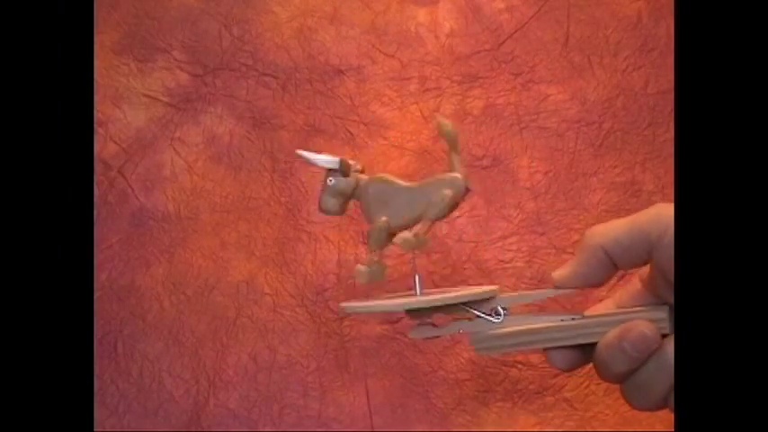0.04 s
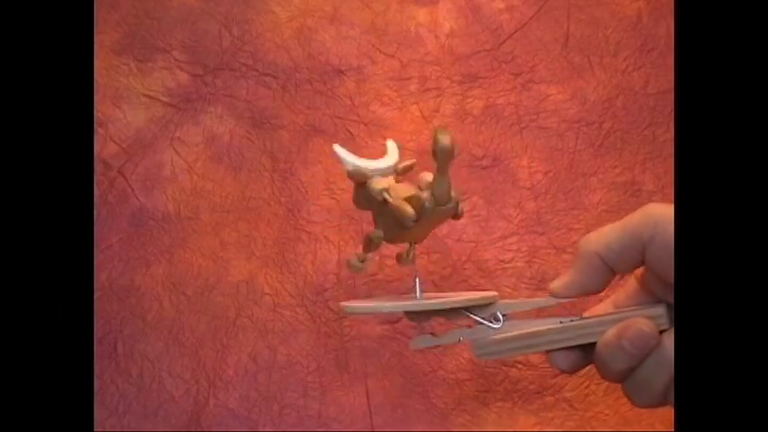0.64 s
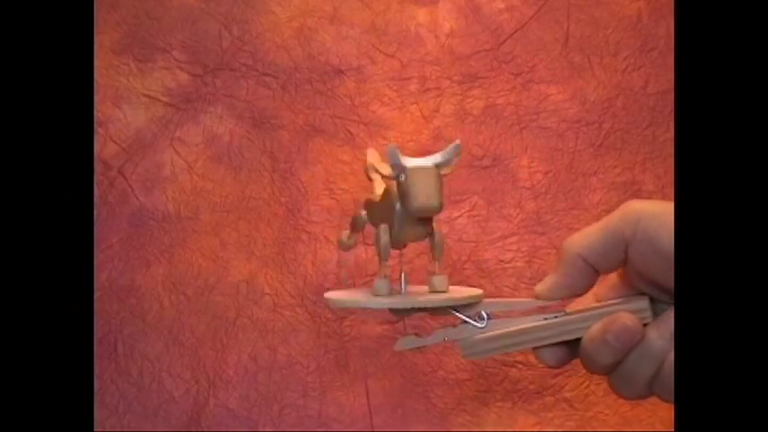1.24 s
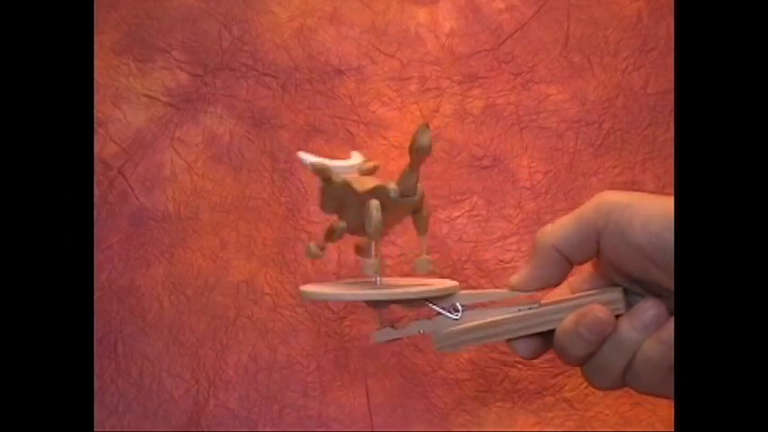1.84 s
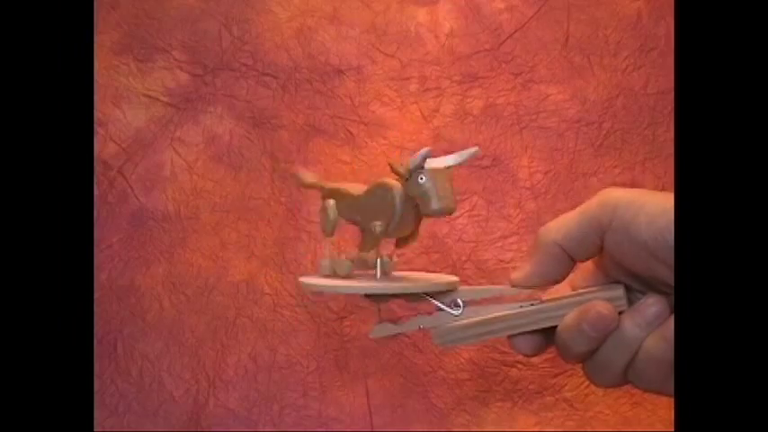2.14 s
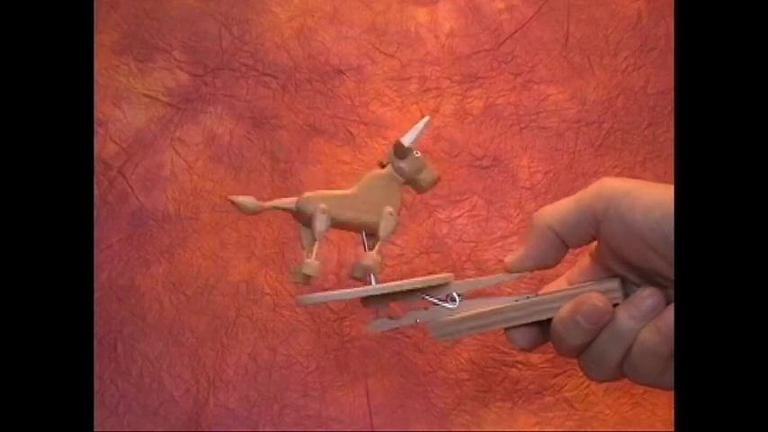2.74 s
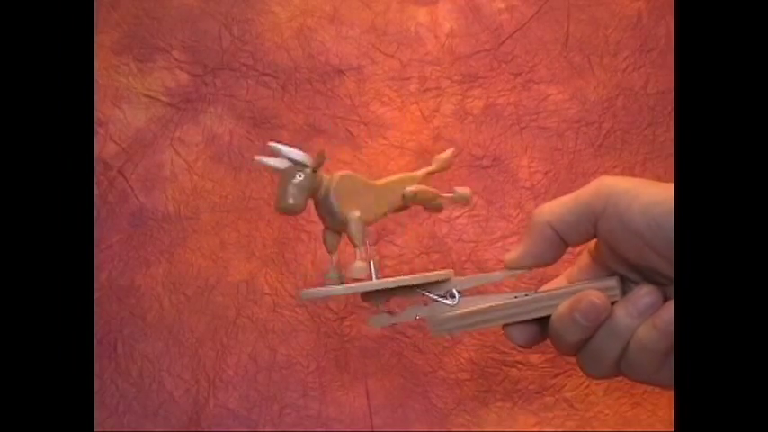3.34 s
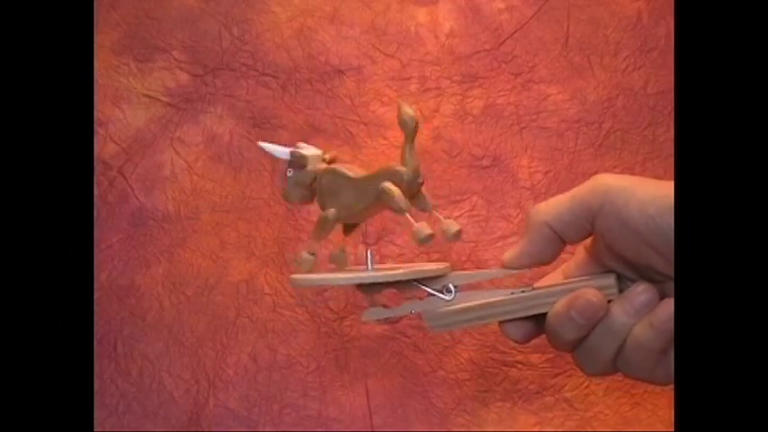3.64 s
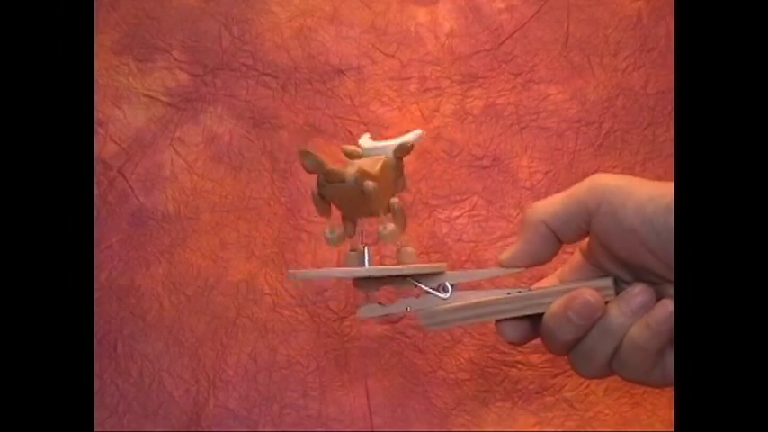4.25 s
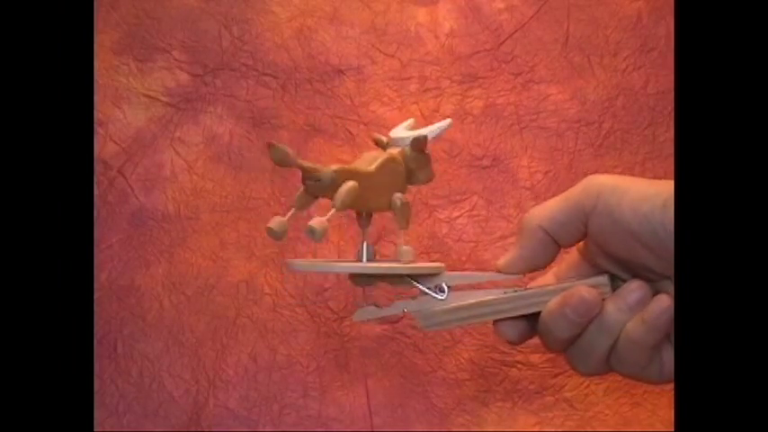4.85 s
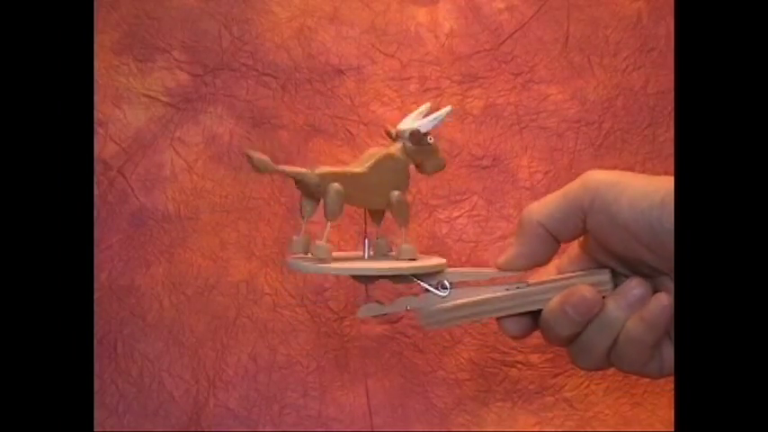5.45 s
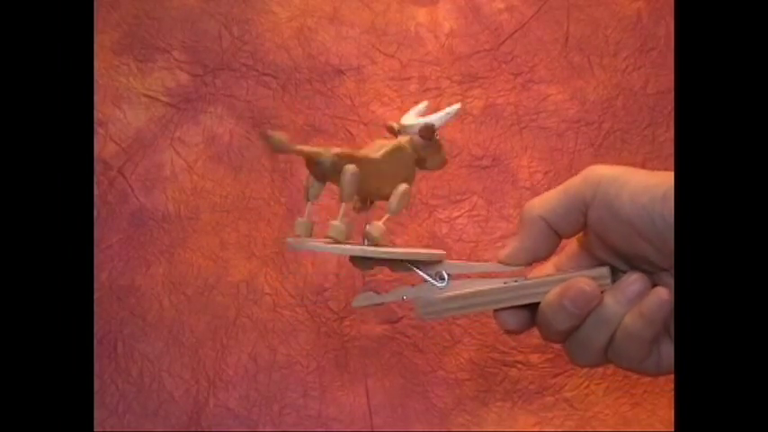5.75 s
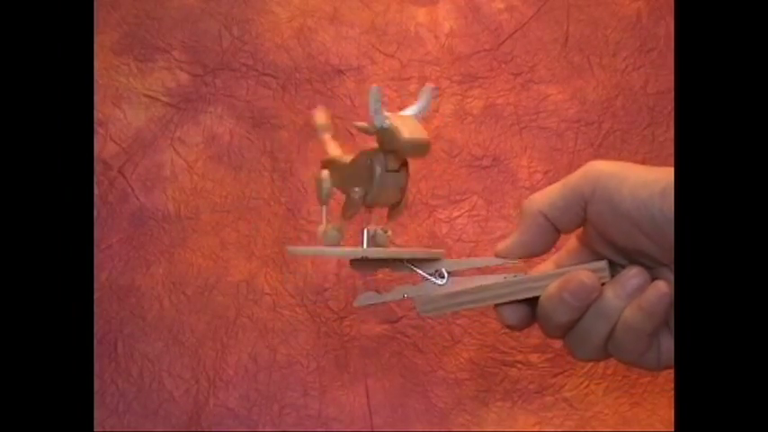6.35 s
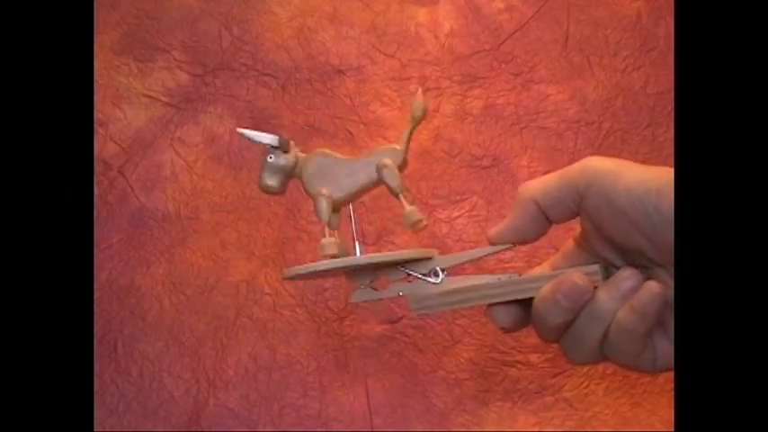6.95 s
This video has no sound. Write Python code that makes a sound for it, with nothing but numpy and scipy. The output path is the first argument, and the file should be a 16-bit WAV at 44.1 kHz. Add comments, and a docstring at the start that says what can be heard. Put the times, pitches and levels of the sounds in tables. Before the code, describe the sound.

Quick, uneven wooden clicks and dry little scrapes come from a toy bull bucking on a squeezed clothespin.

```python
"""A bucking wooden toy bull

A jointed wooden bull bucks and spins on a wire above a clothespin that a hand squeezes about seven
times a second. At each squeeze or release the wire and spring rasp over the wood in tiny slips, and
loose legs, head and tail clack on the body and platform. A few hard knocks also ping the wire.
The toy is close by, in a small dry room with soft hiss and a faint low drone."""
import sys
import numpy as np
from scipy import signal
from scipy.io import wavfile

SR = 44100
rng = np.random.default_rng(int(sys.argv[2]) if len(sys.argv) > 2 else 0)


def int16_out(signal):
    """Quantize to a 16-bit WAV file."""
    q = np.round(np.clip(np.atleast_2d(signal).T, -1, 1) * 32767)
    wavfile.write(sys.argv[1], SR, q.astype(np.int16))


N = 317079

# tone of the background hiss: (frequency [Hz], relative level per Hz [dB])
HISS_SPECTRUM = [(25, -35), (60, -14.5), (135, -16), (215, -3), (380, -4.5), (520, 4), (680, 0), (950, 0.5),
                 (1600, -0.5), (3000, -9), (5500, -16), (9000, -20.5), (15000, -30)]
# the hiss grows a little louder halfway: (time [s], level [dB])
HISS_LEVEL = [(0.0, -52), (3.02, -51.5), (3.8, -49.5), (7.19, -49.5)]
# how alike the hiss is in both ears: (frequency [Hz], likeness [0 to 1])
HISS_LIKENESS = [(40, 0.83), (120, 0.25), (300, 0.52), (600, 0.7), (1500, 0.84), (5000, 0.66),
                 (12000, 0.14)]
# hollow resonances in the hiss: (frequency [Hz], width [Hz], relative level [dB])
HISS_MODES = [(99.2, 5.7, 1.5), (166, 5.3, -2), (305, 22, -4.5), (502, 48, 0.5), (777, 50, -4.5),
              (950, 78, -1.5)]
# swells of the low drone: (start [s], length [s], pitch [Hz], level [dB])
DRONE_SWELLS = [(3.528, .22, 48, -69), (3.78, 0.22, 59, -66), (4.039, 0.29, 62, -72.5), (5.3, .75, 61, -79),
                (6.672, 0.6, 50, -71)]
# the room's echoes: (frequency [Hz], relative level per Hz [dB], time to fade by 60 dB [s])
ROOM_ECHOES = [(298, 0.5, 0.22), (970, 7.5, 0.067), (2560, 1.5, 0.19), (4520, -1, 0.2), (8000, -1.5, 0.14),
               (14000, -17, 0.35)]
# hard knocks that ping the steel wire: (time [s], peak level [dB])
WIRE_PINGS = [(0.1547, -40), (1.92, -25), (3.2481, -34), (5.0805, -15.5), (6.404, -27)]
# strokes of the wire over the wood: (start [s], length [s], level [dB])
WIRE_STROKES = [(-.04, 0.28, -45), (.15, .055, -45), (0.251, 0.058, -42), (0.324, 0.2, -45.5),
                (0.537, 0.1, -42), (0.616, 0.094, -47.5), (0.695, 0.12, -45), (0.808, 0.052, -43.5),
                (0.869, 0.069, -53), (0.948, 0.16, -40), (1.108, 0.042, -40.5), (1.217, 0.13, -42.5),
                (1.393, 0.074, -40.5), (1.504, .16, -42.5), (1.673, 0.048, -44.5), (1.722, .075, -41.5),
                (1.815, 0.12, -41.5), (1.905, 0.087, -41), (1.983, 0.087, -41.5), (2.108, 0.12, -41.5),
                (2.274, 0.032, -41.5), (2.348, 0.051, -48), (2.432, 0.13, -41), (2.576, 0.12, -45.5),
                (2.746, 0.14, -42), (2.909, .05, -45), (3.05, .12, -41.5), (3.196, 0.13, -41.5),
                (3.352, 0.11, -42), (3.478, 0.16, -44.5), (3.639, 0.12, -41), (3.785, 0.086, -42.5),
                (3.851, .06, -54), (3.938, 0.084, -38), (4.124, .055, -44.5), (4.209, 0.19, -46.5),
                (4.399, 0.046, -41.5), (4.483, 0.047, -51), (4.544, 0.11, -38), (4.706, 0.089, -43.5),
                (4.829, 0.081, -38), (4.983, 0.038, -43.5), (5.056, 0.027, -52), (5.122, 0.087, -40.5),
                (5.249, 0.1, -44), (5.428, 0.089, -40), (5.568, 0.085, -41.5), (5.727, 0.1, -35),
                (5.839, 0.032, -41.5), (5.866, 0.074, -39), (5.937, 0.058, -44), (6.016, 0.087, -39),
                (6.139, .08, -42), (6.331, 0.07, -40), (6.446, 0.081, -42.5), (6.625, 0.092, -38),
                (6.838, 0.14, -43.5), (6.975, 0.14, -43.5), (7.136, 0.065, -42.5)]
# low resonances of wire, spring and clothespin: (frequency [Hz], width [Hz], relative level [dB])
RASP_LOW_MODES = [(940, 1130, -8.5), (1686, 1140, 1), (2396, 430, 7), (3050, 270, 2), (3750, 350, 0),
                  (4750, 300, 0.5), (5600, 290, 5)]
# their high resonances: (frequency [Hz], width [Hz], relative level [dB])
RASP_HIGH_MODES = [(7000, 1300, -6.5), (7870, 420, 6), (8670, 300, 10), (9330, 2100, -2.5),
                   (10540, 380, 3.5), (12840, 740, 1)]
# modes, the tones the wood rings at: (frequency [Hz], relative level [dB], time to fade by 60 dB [s])
WOOD_MODES = [(1737, -9.5, 0.036), (2343, 6, 0.014), (2796, 3, 0.013), (3270, -3, 0.002), (3676, 5, 0.0092),
              (4275, -5.5, 0.0042), (4970, -9.5, 0.017), (5507, -1, 0.014), (5840, -11, 0.0019),
              (7110, -6.5, 0.0031), (8400, 1.5, 0.014), (9506, -1, 0.0078), (11070, -15.5, 0.014),
              (13300, -34.5, 0.0069)]
# borders that sort those modes into four bands: (frequency [Hz])
BAND_EDGES = [1700, 3000, 4600, 7000, 12000]
# band levels for each kind of contact: (low [dB], middle [dB], upper [dB], top [dB])
CONTACT_TONES = {"tap": (-0.5, -10.5, -1.5, -7.5), "tock": (-2, 2, -9.5, -10.5),
                 "clack": (-6.5, 0.5, -4, -3), "tick": (-7.5, -12, 1, -5), "snap": (-24, -17, -11.5, -4)}
# loose parts knocking: (time [s], level [dB], chatter time [s], kind of contact)
LIMB_KNOCKS = [(0.0325, -38.5, 0.0033, "tock"), (0.0627, -38.5, 0.0033, "tock"),
               (0.1548, -33.5, 0.00066, "clack"), (0.1807, -31, .004, "tick"),
               (0.3001, -25, 0.0082, "clack"), (0.336, -31, 0.0049, "clack"), (0.4173, -39, 0.0015, "tick"),
               (0.5923, -35, 0.0023, "clack"), (0.6045, -50, .0013, "tick"), (0.6187, -28, 0.0049, "clack"),
               (0.695, -22.5, 0.0021, "snap"), (0.7562, -29.5, 0.0069, "tick"),
               (0.8579, -23, 0.0014, "clack"), (0.9082, -38.5, .0017, "tick"),
               (0.9378, -40.5, 0.0019, "tap"), (1.0377, -26.5, .004, "tock"), (1.158, -26, 0.0022, "clack"),
               (1.19, -22.5, 0.0025, "clack"), (1.2739, -37.5, 0.0037, "tick"),
               (1.304, -39.5, 0.0016, "tap"), (1.3582, -36, 0.0022, "clack"),
               (1.429, -41.5, 0.0056, "tock"), (1.457, -42, 0.0033, "tock"),
               (1.4942, -29.5, 0.0017, "tock"), (1.5644, -41, .002, "clack"), (1.5874, -33, 0.0063, "tap"),
               (1.5994, -32, 0.0091, "tap"), (1.7298, -25, 0.0035, "clack"),
               (1.8269, -28.5, 0.0053, "snap"), (1.9195, -26, 0.0043, "clack"),
               (1.995, -37, 0.0026, "tock"), (2.0414, -28.5, 0.0012, "clack"),
               (2.1957, -26, 0.0024, "tick"), (2.2083, -28.5, .003, "snap"),
               (2.3172, -25.5, 0.0014, "clack"), (2.4635, -40, 0.0042, "clack"),
               (2.5095, -33.5, 0.0084, "tock"), (2.581, -34, 0.007, "tap"), (2.6518, -31, 0.0011, "clack"),
               (2.702, -39, 0.0015, "tick"), (2.8202, -31, 0.0022, "tap"), (2.9122, -33, 0.00054, "tick"),
               (2.9634, -27.5, 0.0042, "clack"), (2.9978, -27, .0014, "tock"), (3.097, -27, 0.006, "tick"),
               (3.2482, -23.5, 0.0014, "snap"), (3.259, -48, .003, "tick"), (3.3577, -42.5, 0.0029, "tick"),
               (3.409, -36, 0.0012, "tick"), (3.5502, -32.5, 0.0024, "clack"), (3.561, -28.5, .002, "snap"),
               (3.7079, -39.5, 0.0097, "tock"), (3.839, -28, 0.0039, "clack"), (3.8873, -38, .006, "snap"),
               (3.8985, -37, .001, "tick"), (4.0974, -44.5, 0.011, "tap"), (4.1804, -30.5, 0.0012, "clack"),
               (4.291, -34.5, 0.0036, "tick"), (4.3877, -43, .008, "tap"), (4.443, -23.5, .0025, "clack"),
               (4.5997, -34.5, 0.0024, "tap"), (4.661, -35.5, 0.0055, "tap"),
               (4.7629, -35.5, 0.0015, "clack"), (4.8134, -41, 0.0049, "tap"), (4.8602, -29, .004, "snap"),
               (5.0198, -30.5, 0.0042, "clack"), (5.0797, -28.5, .001, "tick"), (5.1562, -32, 0.01, "tap"),
               (5.1774, -35, 0.0031, "tap"), (5.2966, -29, 0.0018, "clack"), (5.459, -30, .005, "tick"),
               (5.4801, -31, 0.0015, "tick"), (5.7826, -28.5, 0.0022, "tick"),
               (5.847, -49, 0.0059, "clack"), (5.9155, -32.5, 0.00093, "tick"),
               (5.954, -31.5, 0.006, "tick"), (6.0831, -27, .0035, "tick"), (6.1107, -36, 0.0017, "tick"),
               (6.1467, -23, 0.0017, "tick"), (6.1953, -22.5, 0.0017, "clack"),
               (6.2347, -40.5, .003, "tick"), (6.2874, -41.5, 0.013, "tick"),
               (6.3768, -26, 0.0013, "clack"), (6.397, -26.5, 0.0011, "tick"),
               (6.404, -21.5, 0.00082, "tick"), (6.466, -32.5, .0014, "tick"),
               (6.479, -29.5, 0.0022, "snap"), (6.5275, -24.5, 0.0017, "clack"),
               (6.5716, -28.5, 0.00082, "tock"), (6.582, -37, 0.0057, "tick"),
               (6.675, -27, 0.00044, "tick"), (6.799, -40, 0.0058, "clack"), (6.9005, -30, 0.0018, "clack"),
               (7.0416, -32.5, .0026, "tick"), (7.183, -23, .0017, "clack")]

ATTACK_SAMPLES = SR // 125   # the first 8 ms of a knock set its level


def from_db(db):
    """Turn decibels into a gain to multiply by."""
    return 10 ** (np.asarray(db) / 20)


def unit_level(x):
    """Scale a sound so that its average power is 1."""
    return x / np.sqrt(np.mean(x ** 2) + 1e-20)


def unit_attack(x):
    """Scale each sound so that its attack has a power of 1."""
    return x / (x[..., :ATTACK_SAMPLES].std(axis=-1, keepdims=True) + 1e-12)


def at_hz(points, hz):
    """Read a value between the rows of a frequency table."""
    frequencies, values = np.transpose(points)
    return np.interp(np.log(hz), np.log(frequencies), values)


def cut(x, hz, kind, order=2):
    """Keep the lows, the highs or one band of a sound."""
    return signal.sosfilt(signal.butter(order, hz, kind, fs=SR, output="sos"), x)


def resonate(x, hz, width_hz):
    """Make a sound ring at one pitch; a narrower width rings longer."""
    r = np.exp(-np.pi * width_hz / SR)
    feedback = [1, -2 * r * np.cos(2 * np.pi * hz / SR), r * r]
    return signal.lfilter(np.array([1, 0, -1]) * (1 - r * r) / 2, feedback, x + 1e-18)


def add(out, start_s, sound):
    """Mix a short sound in at the given time."""
    i = max(round(start_s * SR), 0)
    out[i:i + len(sound)] += sound[:max(N - i, 0)]


def room_hiss():
    """Soft noise, built band by band, partly shared by both ears and partly different."""
    hiss, edges = 0, np.geomspace(25, 16000, 29)
    white = rng.standard_normal((2, 2, N))
    for k, (low, high) in enumerate(zip(edges, edges[1:])):
        shared, side = cut(white[k % 2], [low, high], "band")
        hz = np.sqrt(low * high)
        alike = at_hz(HISS_LIKENESS, hz)
        band = np.sqrt(1 + alike) * shared + np.sqrt(1 - alike) * side * [[1], [-1]]
        hiss += from_db(at_hz(HISS_SPECTRUM, hz)) * band
    level_db = np.interp(np.arange(N) / SR, *np.transpose(HISS_LEVEL))
    # the bass and the resonances stand out more as the hiss grows louder
    swing_db = level_db - level_db.mean()
    hiss += cut(hiss, 420, "low", order=1) * (from_db(0.76 * swing_db) - 1)
    hollow = sum(from_db(db) * resonate(hiss, hz, width) for hz, width, db in HISS_MODES)
    hiss += hollow * from_db(3 * swing_db)
    return from_db(level_db) * unit_level(hiss)


def drone():
    """A low tone that swells and fades a few times, its pitch wavering by about 4 percent."""
    out = np.zeros(N)
    for start, length_s, hz, db in DRONE_SWELLS:
        n = int(length_s * SR)
        waver = unit_level(cut(rng.standard_normal(N), hz=6, kind="low"))[-n:]
        phase = 2 * np.pi * np.cumsum(hz * (1 + 0.04 * waver)) / SR
        swell = np.sin(np.linspace(0, np.pi, n))
        add(out, start, from_db(db) * np.sqrt(2) * swell * np.sin(phase))
    return out


def echo_tail(build_s):
    """Two sets of dense wall echoes that build up quickly, then fade at each band's own rate."""
    t = np.arange(SR // 3) / SR
    echoes, edges = 0, np.geomspace(150, 16000, 11)
    table = np.array(ROOM_ECHOES)
    for low, high in zip(edges, edges[1:]):
        hz = np.sqrt(low * high)
        db, fade_s = at_hz(table[:, [0, 1]], hz), at_hz(table[:, [0, 2]], hz)
        noise = cut(rng.standard_normal((2, len(t))), [low, high], "band")
        echoes += noise * from_db(db - 60 * t / fade_s)
    return echoes * (1 - np.exp(-(t / build_s) ** 2))


def room_echoes(x, turns_per_s, stereo_width):
    """The turning toy faces other walls, so its echoes keep changing and differ in each ear."""
    angle = 2 * np.pi * turns_per_s * np.arange(N) / SR
    echoes = 0
    for facing in (np.cos(angle), np.sin(angle)):
        echoes += signal.fftconvolve((x * facing)[None], echo_tail(build_s=0.0013), axes=1)[:, :N]
    shared, side = echoes
    return x.std() * (unit_level(shared) + stereo_width * unit_level(side) * [[1], [-1]])


def sideways_treble(x, above_hz):
    """Treble that leaves the toy sideways differs between left and right."""
    return cut(x, above_hz, "high", order=1) * [[1], [-1]]


def wall_clicks(hits):
    """Over all directions a knock's modes blur, so the walls get one smooth click in each band."""
    out = np.zeros(N)
    for k, (low, high) in enumerate(zip(BAND_EDGES, BAND_EDGES[1:])):
        clicks = np.full(N, 1e-18)
        for start, hit_db, _, kind in hits:
            add(clicks, start, [from_db(hit_db + CONTACT_TONES[kind][k])])
        # give the click the energy of the knock's attack, whatever the band's width
        gain = np.sqrt(ATTACK_SAMPLES * SR / (2 * (high - low)))
        out += (-1) ** k * gain * cut(clicks, [low, high], "band")
    return out


def knock_force(t, chatter_s, rebound_s, bounce, grit):
    """The push of one knock: a loose joint chattering, a first touch and a weaker rebound."""
    chatter = grit * rng.standard_normal(len(t)) * (rng.random(len(t)) < 0.15)
    force = chatter * np.exp(-(t / max(chatter_s, 0.0005)) ** 2)
    force[0] += 1
    rebound_at = round(rebound_s * rng.uniform(0.8, 1.2) * SR)
    force[rebound_at] += bounce * rng.uniform(0.5, 0.51)
    return force


def wire_pings(hz, width_hz):
    """When knocked hard, the short steel wire rings very high for a few milliseconds."""
    out, t = np.zeros(N), np.arange(SR // 50) / SR
    for start, db in WIRE_PINGS:
        force = knock_force(t, chatter_s=0.0011, rebound_s=0.0011, bounce=0.55, grit=0.3)
        ring = resonate(force, hz, width_hz)
        add(out, start, from_db(db) * ring / np.abs(ring).max())
    return out


def rasp_ring(friction, modes):
    """Friction rings a group of resonances, added with alternating signs."""
    rings = ((-1) ** k * from_db(db) * resonate(friction, hz, width)
             for k, (hz, width, db) in enumerate(modes))
    return unit_level(sum(rings))


def wire_rasp(slips_per_s, size_spread_db, smooth_noise, clump_db, clump_hz):
    """The wire slides in tiny slips that ring the spring and clothespin, louder as it moves faster."""
    t, power = np.arange(N) / SR, np.zeros(N)
    for start, length_s, db in WIRE_STROKES:
        now = slice(max(int(start * SR), 0), int((start + length_s) * SR))
        progress = (t[now] - start) / length_s
        # speed up for 31 percent of the stroke, then slow to a stop
        speed = np.sin(np.pi / 2 * np.interp(progress, [0, 0.31, 1], [0, 1, 2]))
        power[now] += (from_db(db) * speed) ** 2
    sizes = from_db(size_spread_db * np.minimum(rng.exponential(1, N), 5)) * rng.choice([-1, 1], N)
    slips = sizes * (rng.random(N) < slips_per_s / SR)
    friction = unit_level(slips) + smooth_noise * rng.standard_normal(N)
    # the grain of the wood makes the slips come in clumps
    grain = unit_level(cut(rng.standard_normal(N), clump_hz, "low"))
    friction *= from_db(clump_db * grain)
    low, high = rasp_ring(friction, RASP_LOW_MODES), rasp_ring(friction, RASP_HIGH_MODES)
    return np.sqrt(power) * (low + from_db(-4.5) * high)


def joint_jiggles(per_stroke, level_db, spread_db, chatter_s):
    """Each stroke faintly rattles the joints while the wire is fast; gives rows like LIMB_KNOCKS."""
    hits, kinds = [], list(CONTACT_TONES)
    for start, length_s, _ in WIRE_STROKES:
        for when, strength, pick in rng.random((per_stroke, 3)):
            time_s = start + length_s * (0.15 + 0.6 * when)
            db = level_db + spread_db * (2 * strength - 1)
            hits.append((time_s, db, chatter_s, kinds[int(pick * len(kinds))]))
    return hits


def wood_ring(force, detune, spread_db):
    """The wood rings in four bands. Each knock finds another spot, so pitches and strengths shift."""
    rings = np.zeros((len(BAND_EDGES) - 1, len(force)))
    for hz, db, fade_s in WOOD_MODES:
        band = np.searchsorted(BAND_EDGES[1:-1], hz)
        width_hz = np.log(1000) / (np.pi * fade_s)
        strength = from_db(db + spread_db * rng.standard_normal()) / np.sqrt(width_hz)
        sign = rng.choice([-1, 1])
        shifted_hz = hz * (1 + detune * rng.uniform(-1.13, 1))
        rings[band] += sign * strength * resonate(force, shifted_hz, width_hz)
    return unit_attack(rings)


def wood_crack(t, fade_s):
    """Countless fast-dying modes between the strong ones make a dry crack, in the same four bands."""
    burst = rng.standard_normal(len(t)) * from_db(-60 * t / fade_s)
    bands = [cut(burst, edges, "band") for edges in zip(BAND_EDGES, BAND_EDGES[1:])]
    return unit_attack(np.array(bands))


def limb_knocks(hits, detune, spread_db, evenness, crack_db, crack_s, tap_db, tap_hz, tap_width_hz):
    """Loose wooden parts strike with a ring and a crack; the platform answers with a hollow tap."""
    clacks, taps, t = np.zeros(N), np.zeros(N), np.arange(SR // 25) / SR
    for start, hit_db, chatter_s, kind in hits:
        bands_db = hit_db + np.array(CONTACT_TONES[kind])
        bands_db = bands_db + evenness * (bands_db.mean() - bands_db)
        force = knock_force(t, chatter_s, rebound_s=0.001, bounce=0.69, grit=0.38)
        ring = wood_ring(force, detune, spread_db)
        crack = from_db(crack_db) * wood_crack(t, crack_s + chatter_s)
        add(clacks, start, from_db(bands_db) @ unit_attack(ring + crack))
        tap = resonate(force, tap_hz * 2 ** rng.uniform(-0.37, 0.58), tap_width_hz)
        add(taps, start, from_db(bands_db[0] + tap_db) * unit_attack(tap))
    return cut(clacks + 1e-18, 920, "high") + taps


def scene():
    """The toy straight ahead, its sideways sound, the room's echoes and the background."""
    hits = LIMB_KNOCKS + joint_jiggles(per_stroke=2, level_db=-45.5, spread_db=2.5, chatter_s=0.00078)
    knocks_ahead = limb_knocks(hits, detune=0.049, spread_db=2.5, evenness=0, crack_db=-11,
                               crack_s=0.028, tap_db=-14, tap_hz=640, tap_width_hz=650)
    # the parts send other modes, and a more even mix of them, to the sides
    knocks_around = limb_knocks(LIMB_KNOCKS, detune=0.098, spread_db=1, evenness=0.43, crack_db=2,
                                crack_s=0.0096, tap_db=-6, tap_hz=520, tap_width_hz=800)
    rasp_ahead = wire_rasp(slips_per_s=5000, size_spread_db=2, smooth_noise=0.5,
                           clump_db=2.8, clump_hz=113)
    rasp_around = wire_rasp(slips_per_s=5500, size_spread_db=1.5, smooth_noise=0.85,
                            clump_db=1.2, clump_hz=100)
    toy = knocks_ahead + rasp_ahead + wire_pings(hz=13400, width_hz=650)
    sides = sideways_treble(knocks_around, above_hz=8200) + sideways_treble(rasp_around, above_hz=12100)
    to_walls = (from_db(-13.5) * wall_clicks(hits) + from_db(-11) * knocks_around
                + from_db(-11.5) * rasp_around)
    echoes = room_echoes(to_walls, turns_per_s=0.9, stereo_width=0.24)
    background = (room_hiss() + drone()) * from_db([[-0.7], [0.7]])   # a little louder on the right
    return toy + from_db(-9) * sides + echoes + background


def record(dry):
    """The microphone softens the highest treble, then the very top is cut off."""
    softened = cut(dry, 13800, "low", order=6)
    return cut(softened, 16000, "low", order=20)


dry = scene()
out = record(dry)
int16_out(out)
```